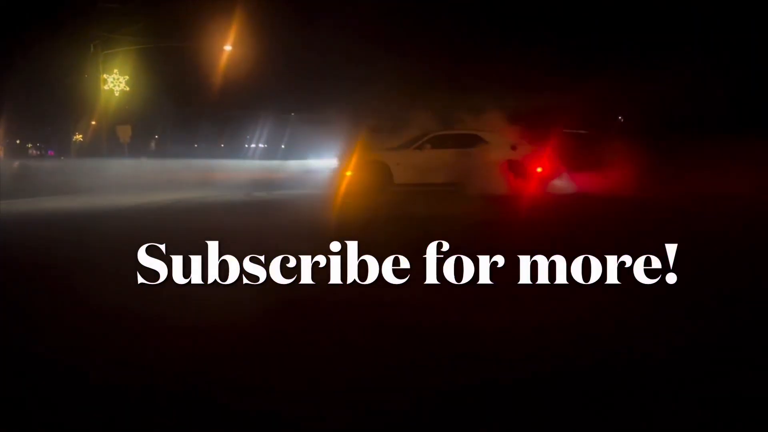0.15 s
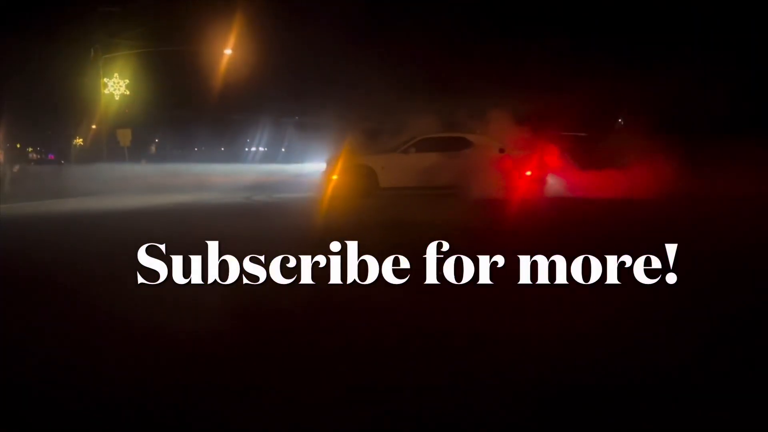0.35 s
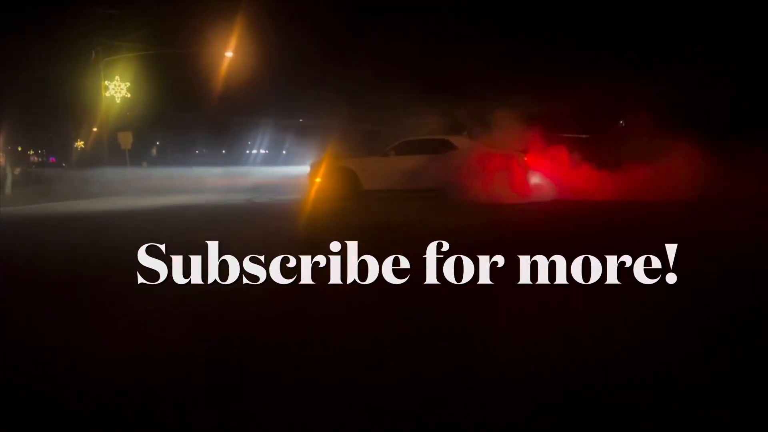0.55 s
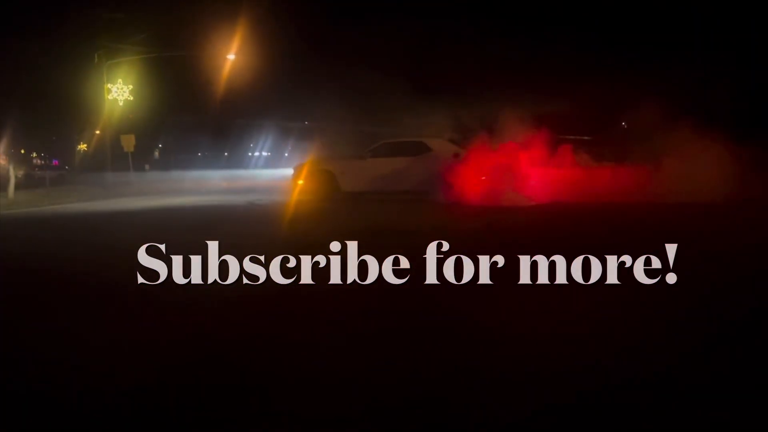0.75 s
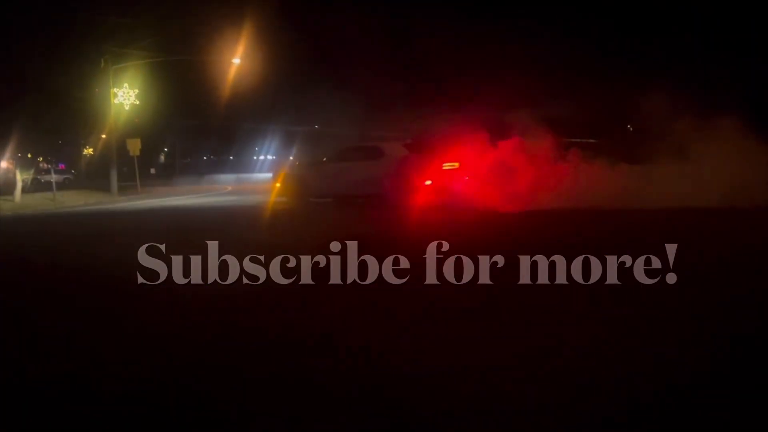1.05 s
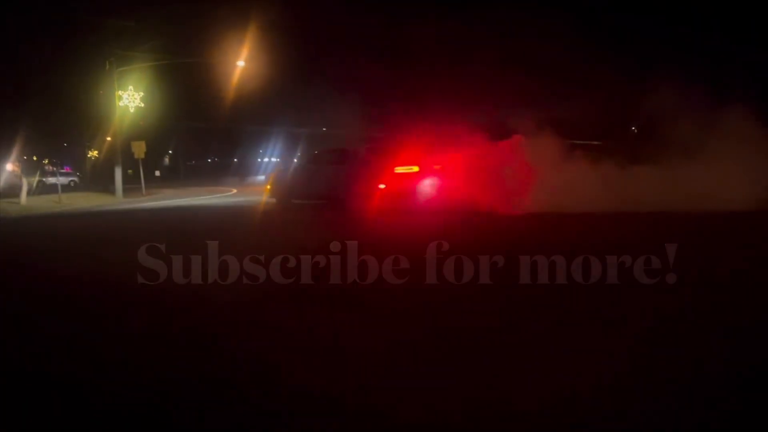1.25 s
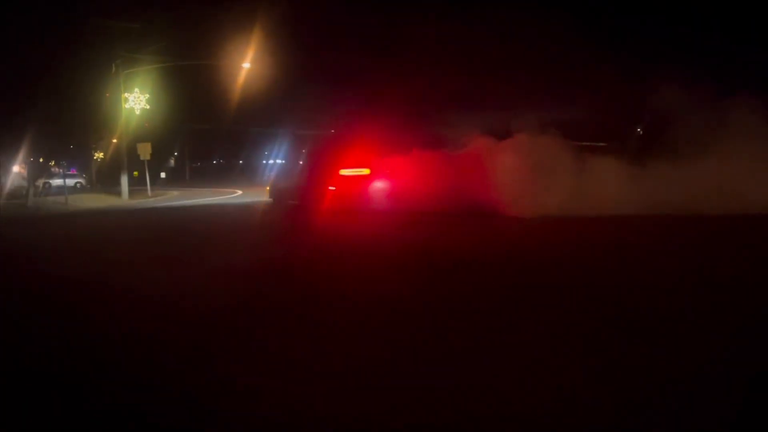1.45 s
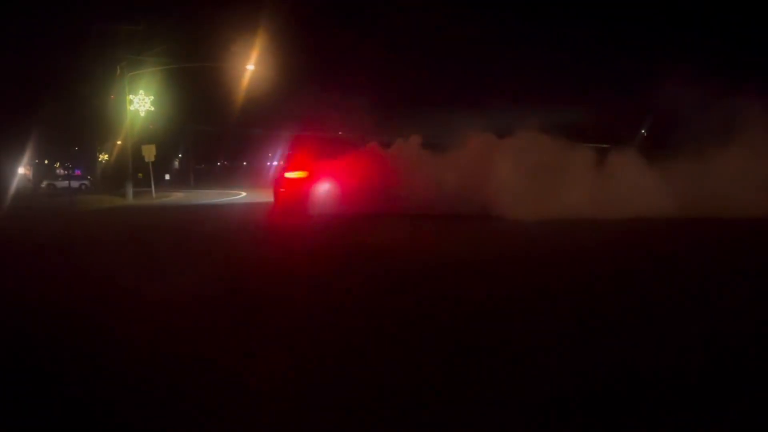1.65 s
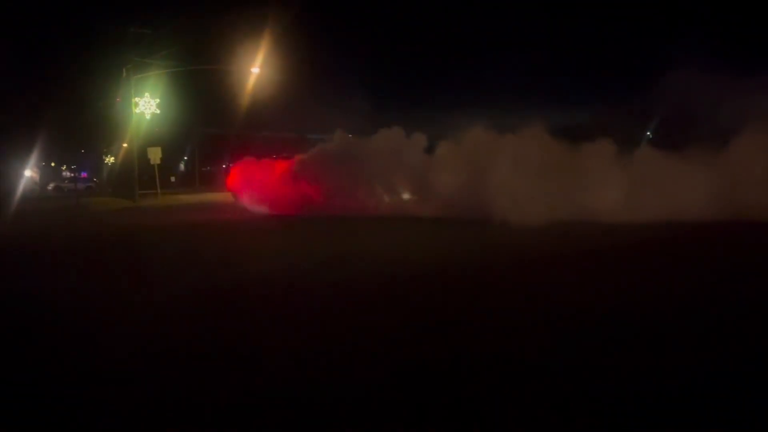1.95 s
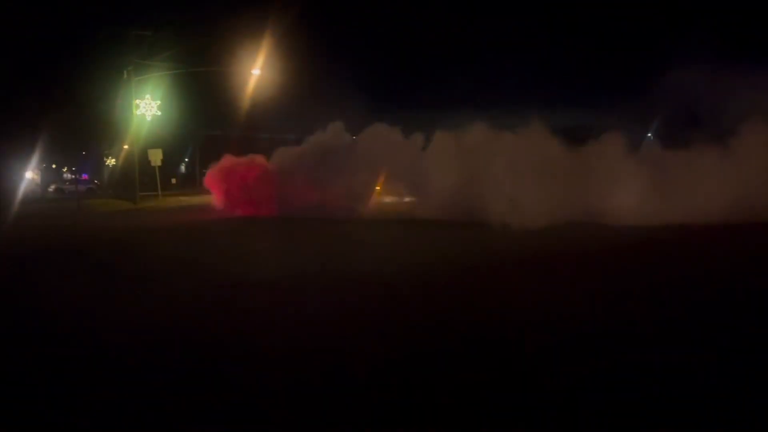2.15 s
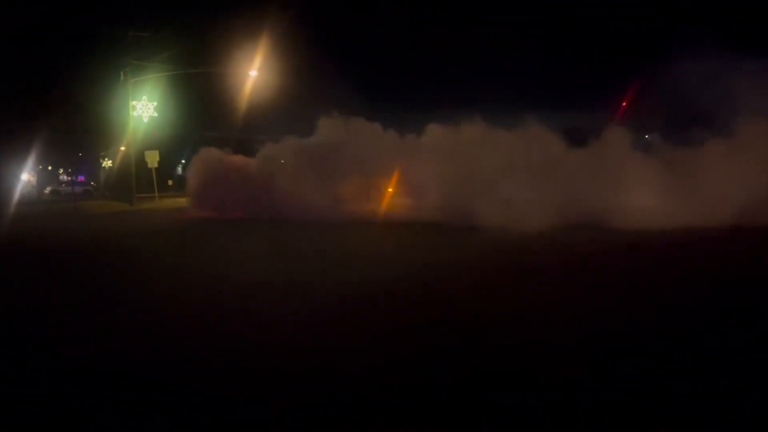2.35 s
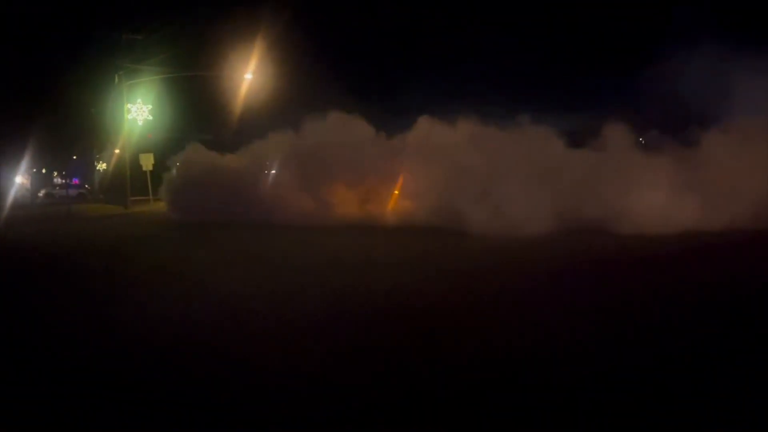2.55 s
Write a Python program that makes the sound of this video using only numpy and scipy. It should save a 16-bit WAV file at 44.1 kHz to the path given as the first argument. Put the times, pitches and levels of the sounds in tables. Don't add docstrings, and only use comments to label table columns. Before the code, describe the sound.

A V8 car does a burnout, engine roaring, dipping and revving up again over hissing, squealing tires

```python
import sys
import numpy as np
from scipy import signal
from scipy.fft import rfft, irfft, next_fast_len
from scipy.io import wavfile
from scipy.ndimage import uniform_filter1d, map_coordinates

SR = 44100
rng = np.random.default_rng(int(sys.argv[2]) if len(sys.argv) > 2 else 0)


def dump_mix(stems):
    frames = np.atleast_2d(stems).T
    limited = np.clip(frames, -1, 1)
    pcm = np.round(limited * 32767).astype(np.int16)
    wavfile.write(sys.argv[1], SR, pcm)


def volts_from_decibels(level):
    exponent = np.asarray(level, float) / 20
    return 10 ** exponent


N = 119070

# (time [s], rate [Hz])
CYCLE_RATE = [(0, 48.6), (.3, 51.6), (.49, 37.9), (.56, 36.7), (.75, 35.7), (1.22, 35.3), (1.33, 33.6),
              (1.44, 29.4), (1.58, 21.4), (1.68, 18.5), (1.8, 18.3), (1.97, 21.9), (2.12, 26.2),
              (2.24, 30.4), (2.36, 35.6), (2.53, 42.3), (2.61, 42.7), (2.7, 41)]
# (time [s], firing [dB], lope under load [dB], bank beat [dB], low throb [dB], tilt [dB/octave])
ENGINE_LEVELS = [(0, -22.5, -33.5, -31, -31, -2), (.13, -22, -28.5, -29.5, -34, -3),
                 (.28, -21.5, -26, -21, -27.5, -11), (.42, -16, -30.5, -29, -27.5, -0.5),
                 (.55, -21, -31, -36, -30, 2.2), (.64, -24.5, -32, -27, -32, 2.5),
                 (.75, -27.5, -28.5, -35, -30.5, -1), (1.0, -21.5, -28, -32.5, -32.5, 1.1),
                 (1.25, -25, -24, -34, -28, -8.5), (1.36, -58, -39.5, -34.5, -40.5, 4),
                 (1.46, -49, -51, -28, -52, -12.5), (1.6, -16.5, -49, -42, -55, -5.5),
                 (1.72, -14, -37, -55, -61, -1.5), (1.92, -13, -44, -42, -46, -6),
                 (2.0, -17.5, -40, -32, -41, -1.5), (2.06, -22, -51, -41, -47, 4.5),
                 (2.12, -30, -44.5, -35, -39.5, 4), (2.2, -37, -41.5, -31, -47, 5.5),
                 (2.27, -23.5, -35, -43, -37, -0.5), (2.36, -22, -27, -52, -33.5, -1),
                 (2.46, -15.5, -31, -29, -30, 2.5), (2.57, -21, -32.5, -36.5, -34, -6),
                 (2.7, -30, -39, -32, -48, -19)]
# (order of the cycle [-], level [dB], extra at top revs [dB])
ORDER_LEVELS = [(1, -19.5, 3), (2, -2.5, 0), (3, 2.5, -1.5), (4, -9.5, 9), (5, -2, 3.5), (6, 1, -1),
                (7, -4, -2.5), (8, -0.5, -2), (9, 1.5, 3.5), (10, 3.5, -9), (11, -5, 2), (12, -5.5, 4),
                (13, -13, -2.5), (14, -3.5, -5), (15, 1, -9.5), (16, -13, -4.5), (17, -4.5, -4),
                (18, -1, -3), (19, -15, 0), (20, -28, -3), (21, -9.5, -15), (22, -9, 3), (23, -6, -5),
                (24, -23, -5), (32, -28.5, 3), (40, -31, 0)]
# (time [s], level [dB])
SHAFT_BEAT = [
    (0, 4.5),
    (.5, 1.5),
    (.55, -10),
    (.65, -11),
    (.74, 0.5),
    (2.52, 2),
    (2.6, -12),
    (2.7, -2),
]
# (centre [Hz], width [Hz], gain [dB])
PIPE_FIRST = [(86, 72, -2.5), (179, 75, -4.5), (291.3, 60, -1), (480, 52, -3.5), (604, 81, -1.5),
              (740, 25, -9), (970, 140, -13), (1190, 420, -22.5)]
# (centre [Hz], width [Hz], gain [dB])
PIPE_SWUNG = [(82.5, 73, -3.5), (173, 58, -2.5), (312.4, 61, -1), (466, 25, 3.5), (604, 46, 2.5),
              (708, 84, 3), (926, 170, -6), (1180, 670, -22)]
# (frequency [Hz], density [dB/Hz])
RASP_COLOUR = [(30, -21), (80, 11), (300, 7), (700, 5), (1500, -28), (3000, -35)]
# (frequency [Hz], density [dB/Hz])
ROAR_COLOUR = [(200, -45), (450, -16.5), (650, -3), (900, 3.5), (1600, -1), (2600, -10.5), (5000, -33),
               (10000, -24)]
# (frequency [Hz], density [dB/Hz])
LOW_ROAR_COLOUR = [(250, -35), (420, -5.5), (650, -7), (900, -7), (1500, -35)]
# (frequency [Hz], density [dB/Hz])
CRACK_COLOUR = [(200, -33), (600, -8), (1200, 0), (2200, -2), (4000, -14), (8000, -40)]
# (time [s], peak [dB])
BIG_SNAPS = [
    (0.2827, -21),
    (0.356, -12),
    (0.432, -19),
    (1.1128, -24),
    (2.356, -20),
    (2.4084, -17),
    (2.437, -20),
    (2.509, -16),
]
# (time [s], exhaust roar [dB], tyre hiss [dB], squeal [dB], hiss spread across ports [dB])
ROAR_AND_TYRES = [(0.0, -30.5, -29.5, -39, -20), (0.43, -26.5, -33, -31.5, -25.5),
                  (0.53, -36.5, -33.5, -43, -28), (0.76, -38.5, -31, -35, -31.5),
                  (1.01, -45.5, -29.5, -32.5, -25.5), (1.1, -34, -28.5, -24.5, -15.5),
                  (1.42, -28.5, -29.5, -41, -7), (1.47, -33.5, -32.5, -22.5, -6.5),
                  (1.62, -34, -36.5, -28, -5), (1.67, -32, -35, -32.5, -4), (1.75, -34, -42.5, -25, -1),
                  (1.82, -39.5, -53.5, -33.5, 2), (1.91, -43, -53.5, -29.5, 0), (2.01, -38, -56, -32, 2.5),
                  (2.06, -36.5, -53, -26, 2), (2.13, -38.5, -52, -31.5, -0.5),
                  (2.47, -29.5, -42.5, -32, 0.5), (2.62, -33.5, -47, -49, 0), (2.67, -32.5, -40.5, -19, -5),
                  (2.7, -34, -46, -42.5, 4)]
# (frequency [Hz], density [dB/Hz])
HISS_COLOUR = [(880, -36), (1500, 1.5), (1630, -4), (2600, -7), (2860, -4.5), (4280, -5.5), (7040, -16),
               (8750, -11.5), (9600, -16), (12500, -1.5), (21100, -120)]
# (frequency [Hz], density [dB/Hz])
HISS_SPREAD_COLOUR = [(1200, -50), (2000, -7.5), (2900, 2), (4900, -4.5), (6300, -19), (7600, -11),
                      (8400, -15), (9500, -49)]
# (frequency [Hz], density [dB/Hz])
TOP_SPREAD_COLOUR = [(8500, -49), (9000, -31), (9500, -3), (10800, -6), (11300, -18), (11700, -53)]
# (frequency [Hz], t60 [s])
STREET_T60 = [(100, 0.1), (1000, 0.7), (8000, 0.55)]
# (time [s], level [dB])
WIND_LEVEL = [
    (0.0, -43),
    (0.07, -58),
    (0.19, -46),
    (0.47, -36),
    (0.61, -63),
    (0.77, -49),
    (1.56, -64),
    (2.1, -51),
    (2.7, -61),
]
# (frequency [Hz], density [dB/Hz])
WIND_COLOUR = [(15, -22), (30, -15), (52, -2.5), (75, -4), (120, -52)]
# (frequency [Hz], left over right [dB])
PORT_BALANCE = [(60, 1), (200, .7), (400, .8), (600, -6), (800, -3), (1100, -1), (1900, 0), (11000, 0)]
# (frequency [Hz], gain [dB])
MID_GAP_GAIN = [(9500, 0), (9750, -60), (11500, -60)]
# (time [s], length [s], level [dB])
TOP_BLIPS = [(0.109, 0.16, -53), (0.311, 0.11, -52.5), (0.495, 0.2, -61), (0.846, 0.047, -60),
             (0.94, 0.056, -62), (1.01, 0.134, -58), (1.25, 0.14, -57), (1.645, 0.05, -53.5),
             (1.71, 0.046, -68), (2.211, 0.036, -69), (2.478, 0.17, -64)]
# (frequency [Hz], density [dB/Hz])
BLIP_COLOUR = [(10700, -70), (10850, 0), (11500, -3), (11650, -70)]


def exhaust():
    cycle_hz, = curves(CYCLE_RATE)
    lope_db = curves(ENGINE_LEVELS)[1]
    start_turns = -0.71
    phase_rad = 2 * np.pi * (np.cumsum(cycle_hz) / SR + start_turns)
    puffs = 1 + 0.16 * (np.cos(phase_rad) + 0.5 * np.cos(2 * phase_rad + 1) + 0.64 * np.cos(3 * phase_rad + 2))

    rasp = volts_from_decibels(lope_db - 6) * unit(puffs * rush(RASP_COLOUR, patches(patchy_db=4.5)))
    source = engine_orders(cycle_hz, phase_rad) + rasp
    swung = np.interp(np.arange(N) / SR, (1.9, 2.04), (0, 1))
    piped = (1 - swung) * filtered(source, pipe_gain(PIPE_FIRST)) + swung * filtered(source, pipe_gain(PIPE_SWUNG))

    roar_db = curves(ROAR_AND_TYRES)[0] - 0.5
    roar = volts_from_decibels(roar_db) * unit(puffs * rush(ROAR_COLOUR, patches(patchy_db=2.0)))
    roar += volts_from_decibels(lope_db - 7) * unit(puffs * rush(LOW_ROAR_COLOUR, patches(patchy_db=0.5)))
    return piped + roar + cracks(lope_db - 13)


def engine_orders(cycle_hz, phase_rad):
    firing_db, lope_db, bank_db, throb_db, tilt_db = curves(ENGINE_LEVELS)
    shaft_db, = curves(SHAFT_BEAT)
    pattern = {k: row for k, *row in ORDER_LEVELS}
    top_revs = np.interp(cycle_hz, (42.5, 48), (0, 1))
    spread_turns, drift_db, drift_rad = -0.014, 1.3, 0.2
    tone = np.zeros(N)
    for k in range(1, 41):
        if k % 8 == 0:
            group_db = firing_db
        elif k in (6, 7, 12):
            group_db = bank_db
        elif k <= 5:
            group_db = throb_db
        else:
            group_db = lope_db
        usual_db, top_db = pattern.get(k, (-13.5, 0))
        db = group_db + tilt_db * max(np.log2(k / 8), 0) + usual_db + top_revs * top_db
        if k == 2:
            db = db + shaft_db
        if k % 8 > 0:
            db = db + drift_db * wobble(8)
        offset_rad = 2 * np.pi * spread_turns * k * k + np.pi / 2 * (k % 2) * (1 - top_revs)
        tone += np.sqrt(2) * volts_from_decibels(db) * np.sin(k * phase_rad + offset_rad + drift_rad * wobble(14))
    return tone


def pipe_gain(pipe):
    def gain(f):
        modes = sum(volts_from_decibels(db) * 1j * f * w / (c * c - f * f + 1j * f * w) for c, w, db in pipe)
        return abs(0.09 + modes)
    return gain


def cracks(db):
    cracks_per_s = 170
    hits = (rng.random(N) < cracks_per_s / SR) * np.sqrt(rng.exponential(size=N))
    crackle = volts_from_decibels(db) * rush(CRACK_COLOUR, hits)
    big = np.zeros(N)
    for s, peak_db in BIG_SNAPS:
        big[round(s * SR)] = volts_from_decibels(peak_db)

    def snap(hz):
        return volts_from_decibels(along(CRACK_COLOUR, hz))
    snap_peak = filtered(np.arange(N) == 0, snap)[0]
    return crackle + filtered(big, snap) / snap_peak


def tyres():
    _, hiss_db, squeal_db, spread_db = curves(ROAR_AND_TYRES)
    flutter = volts_from_decibels(hiss_db + 0.57 * wobble(11.5) + 1.07 * wobble(41.72))
    white, other = patches(patchy_db=1.5), patches(patchy_db=7.5)
    squeals = sum(squeal(hz) for hz in (1170.6, 1269))
    centre = flutter * rush(HISS_COLOUR, white) + volts_from_decibels(squeal_db - 8) * squeals
    lag_share = 0.93
    lagging = rush(HISS_SPREAD_COLOUR, lag_share * white + (1 - lag_share) * other, turn=1j)
    spread = flutter * (volts_from_decibels(spread_db) * lagging + volts_from_decibels(-10) * rush(TOP_SPREAD_COLOUR, other))
    return centre, spread


def squeal(hz):
    width_hz, wander_hz = 95, 29.53
    stick = filtered(rng.standard_normal((2, N)), lambda f: 1 / (1 + (f / width_hz) ** 2))
    phase_rad = 2 * np.pi * np.cumsum(hz + wander_hz * wobble(18)) / SR
    return volts_from_decibels(4.4 * wobble(10.85)) * unit(stick[0] * np.cos(phase_rad) + stick[1] * np.sin(phase_rad))


def street(x):
    hz, t, z = signal.stft(rng.standard_normal((2, SR // 2)), SR, nperseg=256)
    apart_hz = 1300
    z[1] *= 0.32 / (1 + (hz[:, None] / apart_hz) ** 4)
    decay = volts_from_decibels(-60 * t / along(STREET_T60, hz)[:, None])
    both, apart = signal.istft(z * decay, SR, nperseg=256)[1]
    tail = np.array([both + apart, both - apart]) / np.linalg.norm(both)
    delayed = np.pad(x, (1500, 0))[None]
    return signal.fftconvolve(delayed, tail, axes=1)[:, :N]


def wind():
    return volts_from_decibels(curves(WIND_LEVEL)[0] + 2.2 * wobble(14)) * rush(WIND_COLOUR, rng.standard_normal(N))


def unit(x):
    return x / np.sqrt(np.mean(x ** 2) + 1e-20)


def along(points, hz):
    f, v = np.transpose(points)
    return np.interp(np.log(hz + 1), np.log(f + 1), v)


def curves(rows):
    s, *cols = np.transpose(rows)
    t = np.arange(N) / SR
    return [uniform_filter1d(np.interp(t, s, c), size=1301) for c in cols]


def wobble(rate_hz):
    return map_coordinates(rng.standard_normal(400), [np.arange(N) * rate_hz / SR])


def filtered(x, response):
    m = next_fast_len(N + SR // 2)
    return irfft(rfft(x, m) * response(np.fft.rfftfreq(m, 1 / SR)), m)[..., :N]


def rush(colour, white, turn=1):
    return unit(filtered(white, lambda hz: turn * volts_from_decibels(along(colour, hz))))


def patches(patchy_db):
    z = signal.stft(rng.standard_normal(N), nperseg=512)[2]
    field = uniform_filter1d(rng.standard_normal(z.shape), size=7, axis=0)
    field = uniform_filter1d(field, size=9, axis=1)
    return signal.istft(z * volts_from_decibels(patchy_db * unit(field)), nperseg=512)[1][:N]


def scene():
    centre, spread = tyres()
    car = exhaust() + centre
    half = np.array([[0.5], [-0.5]])
    near = filtered(car, lambda hz: volts_from_decibels(along(PORT_BALANCE, hz) * half))
    return near + volts_from_decibels(-7.5) * street(car) + wind() + spread * np.array([[1], [-1]])


def low_pass(x):
    return signal.sosfilt(signal.butter(12, 11710, fs=SR, output="sos"), x)


def record(dry):
    mid, side = (dry[0] + dry[1]) / 2, (dry[0] - dry[1]) / 2
    t = np.arange(N) / SR
    gate = sum(volts_from_decibels(db) * (t > s) * (t < s + length_s) for s, length_s, db in TOP_BLIPS)
    gate = gate * (wobble(30) > -0.6)
    blips = uniform_filter1d(gate, size=601) * rush(BLIP_COLOUR, patches(patchy_db=6))
    mid = filtered(mid, lambda hz: volts_from_decibels(along(MID_GAP_GAIN, hz))) + blips
    return low_pass(np.array([mid + side, mid - side]))


dry = scene()
out = record(dry)
dump_mix(out)
```